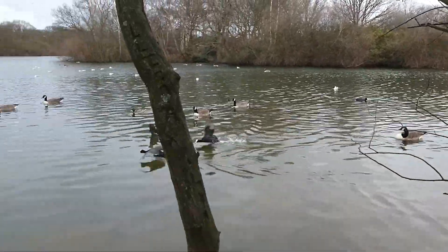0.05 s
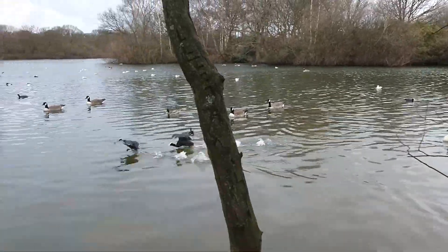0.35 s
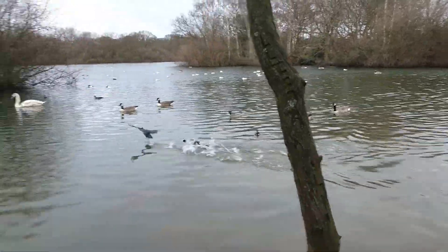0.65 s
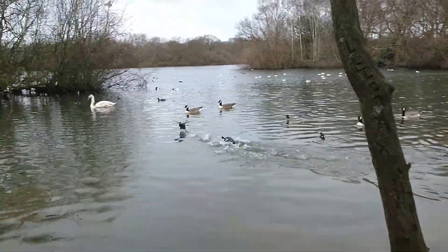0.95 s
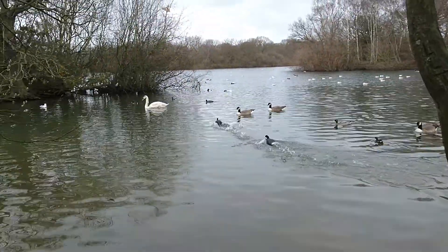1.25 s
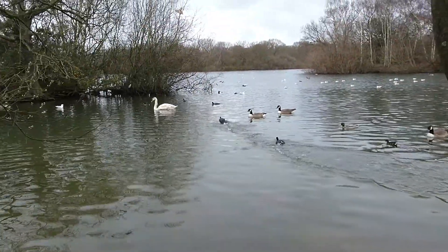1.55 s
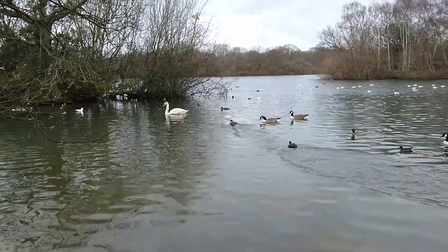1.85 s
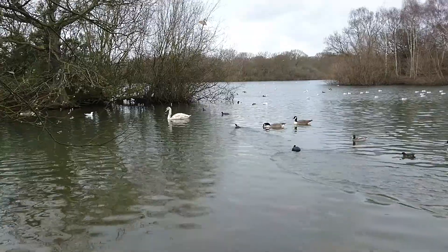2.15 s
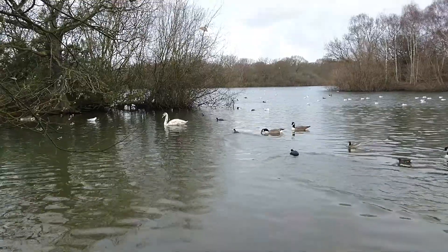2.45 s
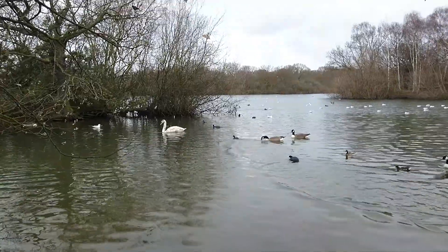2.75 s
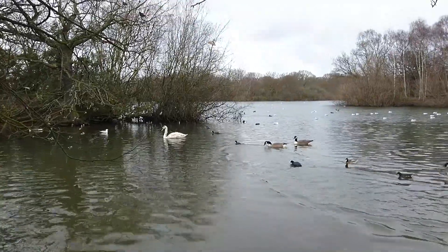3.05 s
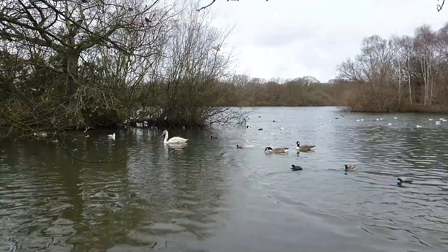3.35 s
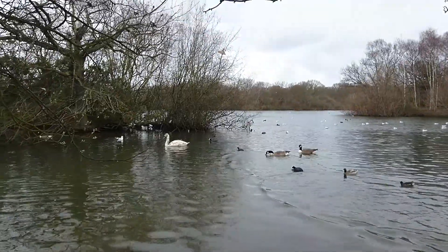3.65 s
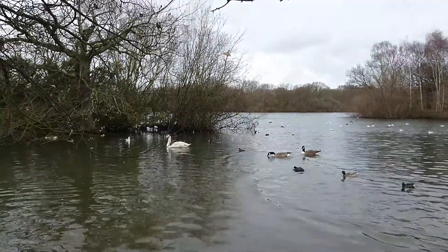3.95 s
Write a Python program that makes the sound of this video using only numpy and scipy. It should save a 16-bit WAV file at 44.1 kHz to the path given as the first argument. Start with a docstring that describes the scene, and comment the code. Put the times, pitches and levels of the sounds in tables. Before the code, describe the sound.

Two coots splash away across a lake with quick foot slaps, spray and plops, just after one sharp call. As the water settles, wind rumbles and thumps on the microphone, mostly on the left, and a distant small bird peeps twice.

```python
"""One sharp coot call, then feet slapping across a lake as two coots chase away from the microphone,
throwing up spray and dragging under air that rings as bubbles and plops. As the water settles, gusts
rumble and buffet the two microphone ports, mostly the left. Late on, a small bird peeps twice in the
distance, over the hush of the far shore."""
import sys
import numpy as np
from scipy import signal
from scipy.fft import rfft, irfft
from scipy.io import wavfile
from scipy.ndimage import uniform_filter1d

SR = 44100
rng = np.random.default_rng(int(sys.argv[2]) if len(sys.argv) > 2 else 0)


def unload_audio(sound):
    """Save the sound as a 16-bit wav file, at the path given as the first command line argument."""
    columns = np.transpose(np.atleast_2d(sound))
    # keep every value between -1 and 1, then stretch to whole-number steps
    steps = np.round(np.clip(columns, -1, 1) * 32767)
    wavfile.write(sys.argv[1], SR, steps.astype(np.int16))


N = 176400

# Feet striking the lake. Each row: start in seconds, spray level in dB, body level in dB.
FOOTFALLS = [(0.217, -34.5, -38), (0.258, -39, -58), (0.337, -40, -45), (0.3753, -34.5, -47),
             (0.4492, -30.5, -40), (0.531, -32.5, -43), (0.627, -36, -62), (0.73, -33.5, -36.5),
             (0.826, -38.5, -39.5), (0.871, -54, -36), (0.9343, -36, -30), (1.068, -42, -33.5)]


def coot_call():
    """Out on the water, a short, hard train of throat pulses whose pitch sags as it ends."""
    # The course of the call. Each row: time in seconds, pitch in Hz, level in dB.
    contour = [(0.128, 802, -47), (0.147, 828.5, -29), (0.165, 817, -31), (0.184, 750, -39.5)]
    # The throat's resonances. Each row: frequency in Hz, gain in dB.
    throat = [(1640, 12.5), (2460, 1.5), (3280, 1.5), (4100, -4), (4930, -7.5), (5750, 4), (6570, 4),
              (7400, -3), (9040, 4), (14000, -31)]
    jitter, roughness = 0.011, 0.45
    s, hz, db = np.transpose(contour)
    t = np.arange(N) / SR
    turns = np.cumsum(np.interp(t, s, hz) * (1 + jitter * drift(350))) / SR
    pulses = sum(np.cos(2 * np.pi * k * turns) for k in range(1, 20))
    voice = unit(colour(pulses, throat)) + roughness * hiss(throat, same=0.11, size=N)
    return voice * amp(np.interp(t, s, db, -120, -120))


def foot_slaps():
    """Each foot cracks the surface; a short shower follows."""
    # The tone of a slap's spray and of its body. Each row: frequency in Hz, gain in dB.
    spray_tone = [(1500, -46), (4000, 3.5), (10000, 6), (16000, -12)]
    body_tone = [(400, -21), (1300, 9), (2300, 5.5), (10000, -16)]
    crack_s, body_s, shower_s = 0.0025, 0.004, 0.011
    out, t = np.zeros((2, N)), np.arange(SR // 6) / SR
    crack_and_shower = burst(t, crack_s) + amp(-16) * burst(t, shower_s)
    for s, spray_db, body_db in FOOTFALLS:
        spray = hiss(spray_tone, same=0.059, size=len(t)) * crack_and_shower
        body = hiss(body_tone, same=0.71, size=len(t)) * burst(t, body_s)
        add(out, s, amp(spray_db) * spray + amp(body_db) * body)
    return out


def wake():
    """Churn, bubbles and falling spray behind the birds; the churn surges after each footfall."""
    # The wake's loudness. Each row: time in seconds, churn level in dB, spray level in dB.
    levels = [(0, -48, -59), (0.25, -47.5, -47.5), (0.55, -44.5, -49), (0.9, -46.5, -44.5),
              (1.2, -42.5, -47.5), (1.6, -51, -57)]
    # The tone of churned water and of falling spray. Each row: frequency in Hz, gain in dB.
    churn_tone = [(200, 10), (750, -14.5), (2200, -2), (3200, -12), (8000, -19)]
    spray_tone = [(1500, -46), (3500, -17.5), (9000, -22), (16000, -45.5)]
    fade_db_per_s, surge_db, bubbles_per_s = 25, 4, 700
    s, churn_db, spray_db = np.transpose(levels)
    t = np.arange(N) / SR
    surges = sum(burst(np.maximum(t - start, 0), peak_s=0.035) for start, _, _ in FOOTFALLS)
    bubbles = np.zeros((2, N))
    pitches_hz = np.geomspace(680, 2600, 30)
    for hz in pitches_hz:
        births = clicks(bubbles_per_s / len(pitches_hz))
        ring = signal.oaconvolve(births, bubble(hz, cycles=5))[:N]
        bubbles += ring * pan(rng.normal(-6.5, 7))
    churn = amp(drift(21)) * shower(churn_tone, same=0.57) + amp(-3.5) * unit(bubbles)
    churn *= amp(np.interp(t, s, churn_db) + surge_db * surges)
    spray = amp(drift(19)) * shower(spray_tone, same=0.019)
    spray *= amp(np.interp(t, s, spray_db))
    settling = amp(-fade_db_per_s * np.maximum(t - s[-1], 0))
    return settling * (churn + spray)


def shower(tone, same, drops_per_s=12000):
    """Drops land so thickly that they merge into a stereo wash of rms 1."""
    drops = np.array([clicks(drops_per_s) for _ in range(3)])
    return unit(colour(pair(drops, same), tone))


def plops():
    """The feet drag large pockets of air under, which ring low."""
    # Air pockets closing. Each row: start in seconds, pitch in Hz, level in dB.
    pockets = [(0.246, 820, -27), (0.322, 846, -30), (0.492, 686, -27.5), (0.541, 660, -25),
               (0.583, 690, -23.5), (0.639, 660, -28)]
    out = np.zeros((2, N))
    for s, hz, db in pockets:
        add(out, s, amp(db) * bubble(hz, cycles=4.5))
    return out


def bubble(hz, cycles, rise=0.022):
    """A pocket of air rings and rises in pitch, dying by 1/e in the given number of cycles."""
    age = np.arange(SR // 12) / SR * hz / cycles
    envelope = (1 - np.exp(-age * 6)) * np.exp(-age)
    return envelope * np.sin(2 * np.pi * cycles * (age + rise * age ** 2 / 2))


def wind():
    """Each microphone port rumbles on its own; gusts swell over the breeze, strong ones flutter more."""
    # Gusts. Each row: peak time in seconds, half width in seconds, level in dB, left over right in dB.
    gusts = [(0.756, 0.057, -23, 4.5), (1.073, 0.027, -26, 18), (1.681, 0.072, -18, 11),
             (1.907, 0.061, -15, 7), (2.156, 0.079, -13.5, 34), (2.377, 0.052, -15, -2.5),
             (2.987, 0.059, -23, 3), (3.326, 0.14, -21, -2.5), (3.615, 0.025, -22, -5),
             (3.99, 0.13, -18.5, -4)]
    # The tone of the deep rumble and of the flutter above it. Each row: frequency in Hz, gain in dB.
    rumble_tone = [(28, -65), (48, -2.5), (65, 1), (100, -2.5), (250, -20.5), (500, -44), (10000, -125)]
    flutter_tone = [(80, -30), (190, 4), (380, 9), (600, -24), (1200, -12), (5000, -100)]
    breeze_db, flutter_db, flutter_growth, ragged_db = -29.5, -9, 1.6, 5.5
    t = np.arange(N) / SR
    power = np.full((2, N), amp(breeze_db) ** 2)
    for s, width, db, side_db in gusts:
        swell = np.exp(-((t - s) / width) ** 2 / 2)
        power += (amp(db) * pan(side_db) * swell) ** 2
    out = []
    for port_db in 10 * np.log10(power):
        rumble = unit(colour(rng.standard_normal(N), rumble_tone))
        rumble /= np.sqrt(uniform_filter1d(rumble ** 2, size=3000))  # steadied, so the gusts set the level
        flutter = unit(colour(rng.standard_normal(N), flutter_tone) * amp(ragged_db * drift(102)))
        out.append(rumble * amp(port_db) + flutter * amp(flutter_db + flutter_growth * port_db))
    return np.array(out)


def buffets():
    """An eddy's push and pull thuds in the microphone, then tears into cracks that ring the port."""
    # Eddies. Each row: start in seconds, thud level in dB, crackle level in dB, left over right in dB.
    eddies = [(1.053, -18.5, -47, 14), (1.31, -20.5, -38, 28), (1.662, -12, -20, 40), (1.715, -14, -21, 37),
              (1.861, -13, -34, -10), (1.898, -12.5, -12, 34), (1.968, -8.5, -23.5, 38),
              (2.008, -11.5, -28.5, 17), (2.074, -9, -22, 45), (2.096, -9.5, -11.5, 28),
              (2.147, -9.5, -15.5, 35), (2.169, -13.5, -6.5, 45), (2.367, -15, -36, -8),
              (2.402, -10, -29.5, -20), (3.246, -14.5, -48, 17), (3.565, -17, -59, 10),
              (3.962, -8, -23, -30)]
    # The port's resonance. Each row: frequency in Hz, gain in dB.
    port_tone = [(60, -14), (220, 5), (470, 6), (680, 1), (880, 3), (1300, -10), (2000, -23), (4600, -31),
                 (7000, -60)]
    thud_s, tears_per_s, tear_decay_s = 0.0013, 900, 0.014
    out, t = np.zeros((2, N)), np.arange(SR // 10) / SR
    port_ring = ringing(port_tone, size=2048)
    age = t / thud_s
    push_pull = age ** 2 * (3 - age) * np.exp(-age)
    low_cut = signal.tf2sos(*signal.butter(6, 60, "high", fs=SR))
    thud = signal.sosfilt(low_cut, push_pull)
    for s, thud_db, crackle_db, side_db in eddies:
        tears = (rng.random(len(t)) < tears_per_s / SR) * rng.uniform(-0.87, 1, len(t))
        crackle = signal.oaconvolve(tears * np.exp(-t / tear_decay_s), port_ring)[:len(t)]
        hit = amp(thud_db) * thud / abs(thud).max() + amp(crackle_db) * crackle / abs(crackle).max()
        add(out, s, pan(side_db) * hit)
    return out


def small_bird():
    """Thin falling whistles from the trees, blurred by distance."""
    # Peeps. Each row: start and length in seconds, first and last pitch in Hz, level in dB.
    peeps = [(2.845, 0.052, 7700, 7050, -55.5), (3.399, 0.036, 7400, 6200, -55.5)]
    blur_hz = 170
    out = np.zeros((2, N))
    for s, length, from_hz, to_hz, db in peeps:
        progress = np.linspace(0, 1, round(length * SR))
        blur = blur_hz * np.array([drift(580), drift(550)])[:, :len(progress)]
        hz = from_hz + (to_hz - from_hz) * progress + blur
        whistle = np.sin(2 * np.pi * np.cumsum(hz, axis=1) / SR)
        add(out, s, amp(db) * np.sin(np.pi * progress) * whistle)
    return out


def far_shore():
    """A faint, steady hush from across the lake."""
    # The tone of the hush. Each row: frequency in Hz, gain in dB.
    hush_tone = [(400, 0), (950, -1), (1500, -9), (3200, -17), (6000, -25), (12000, -28)]
    return amp(-49) * hiss(hush_tone, same=0.46, size=N)


def amp(db):
    """Decibels to gain."""
    return 10 ** (np.asarray(db) / 20)


def unit(x):
    """Scales to rms 1."""
    return x / np.sqrt(np.mean(x ** 2) + 1e-20)


def gain_at(freqs, tone):
    """Gains along a (Hz, dB) curve, on a log frequency axis."""
    hz, db = np.transpose(tone)
    return amp(np.interp(np.log(abs(freqs) + 1), np.log(hz), db))


def colour(x, tone):
    """Filters by a (Hz, dB) curve."""
    n = x.shape[-1]
    return irfft(rfft(x) * gain_at(np.fft.rfftfreq(n, 1 / SR), tone), n)


def ringing(tone, size):
    """The causal impulse response of a (Hz, dB) curve."""
    log_gain = np.log(gain_at(np.fft.fftfreq(size, 1 / SR), tone))
    return np.fft.ifft(np.exp(signal.hilbert(log_gain).conj())).real


def drift(hz):
    """A random wander of rms 1, up to about the given rate."""
    roll_off = np.exp(-(np.fft.rfftfreq(N, 1 / SR) / hz) ** 2)
    return unit(irfft(rfft(rng.standard_normal(N)) * roll_off, N))


def hiss(tone, same, size):
    """Coloured stereo noise of rms 1."""
    return unit(colour(pair(rng.standard_normal((3, size)), same), tone))


def clicks(per_s, spread_db=3):
    """Randomly timed clicks of uneven size."""
    impulses = (rng.random(N) < per_s / SR) * rng.choice([-1, 1], N)
    return impulses * amp(spread_db * np.minimum(rng.exponential(1, N), 4))


def burst(t, peak_s):
    """An envelope that rises to 1 at peak_s and dies away."""
    return t / peak_s * np.exp(1 - t / peak_s)


def pan(db):
    """Left and right gains of constant power, the left louder by db."""
    return unit(amp([[db / 2], [-db / 2]]))


def pair(three, same):
    """Two channels from one shared and two separate signals; same is the shared part of the power."""
    return np.sqrt(same) * three[0] + np.sqrt(1 - same) * three[1:]


def from_left(x, lag_samples=4):
    """Sound from the left reaches the right port a little later."""
    return np.array([x[0], np.roll(x[1], lag_samples)])


def add(mix, s, sound):
    """Mixes a sound in at s seconds."""
    part = mix[..., max(round(s * SR), 0):][..., :sound.shape[-1]]
    part += sound[..., :part.shape[-1]]


def scene():
    """Coots out on the lake, wind right on the microphone, a small bird and the far shore behind."""
    chase = coot_call() + from_left(foot_slaps() + wake() + plops())
    return chase + wind() + buffets() + small_bird() + far_shore()


def record(dry):
    """Microphone colour, a soft overload on the hardest buffets, then the band limit."""
    # The microphone's dip and peak in the treble. Each row: frequency in Hz, gain in dB.
    mic_response = [(6800, 0), (7850, -12), (8500, -3), (9300, 6.5), (11000, 0)]
    ceiling, edge_hz = 0.95, 16000
    picked_up = colour(dry, mic_response)
    limited = picked_up / (1 + (picked_up / ceiling) ** 6) ** (1 / 6)
    low_pass = signal.firwin(401, edge_hz, window=("kaiser", 8), fs=SR)
    return signal.oaconvolve(limited, low_pass[None], "same")


dry = scene()
out = record(dry)
unload_audio(out)
```